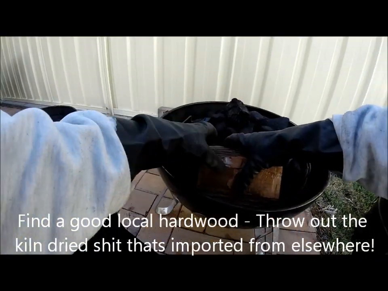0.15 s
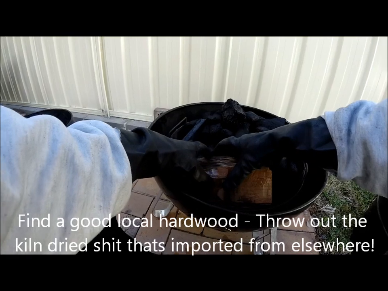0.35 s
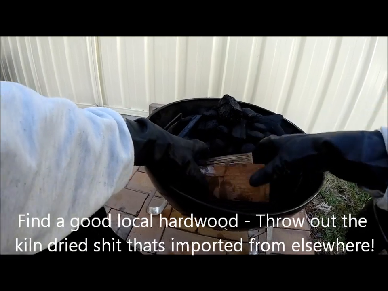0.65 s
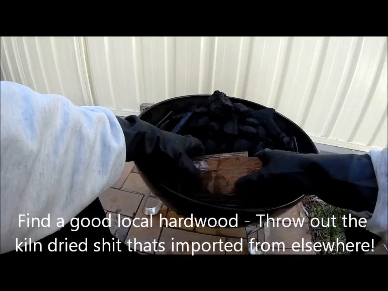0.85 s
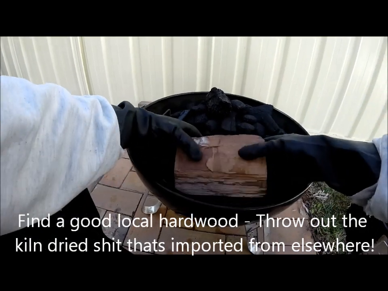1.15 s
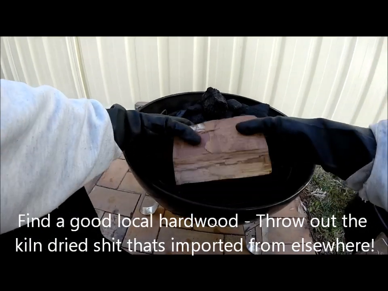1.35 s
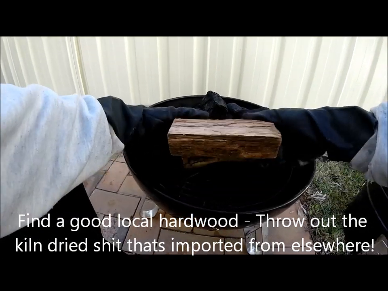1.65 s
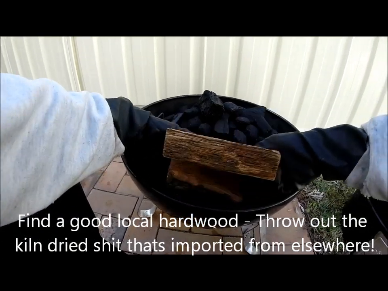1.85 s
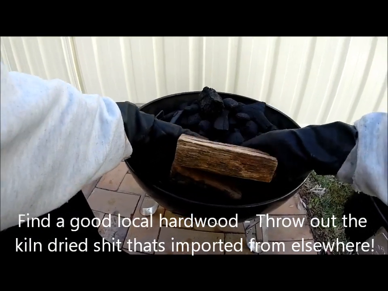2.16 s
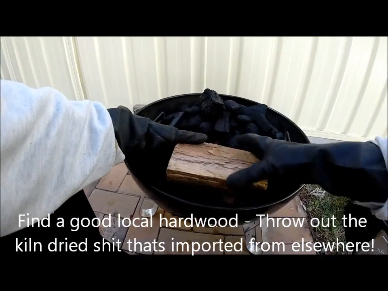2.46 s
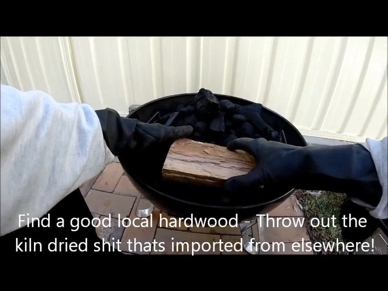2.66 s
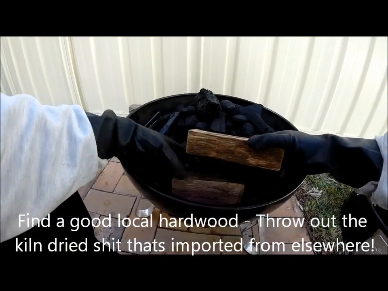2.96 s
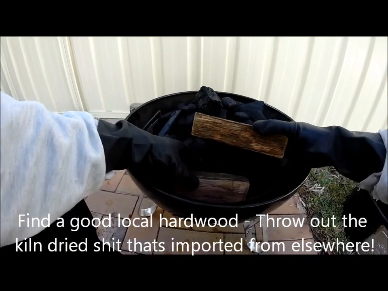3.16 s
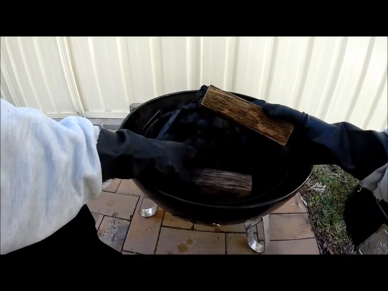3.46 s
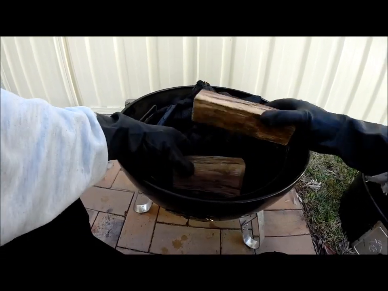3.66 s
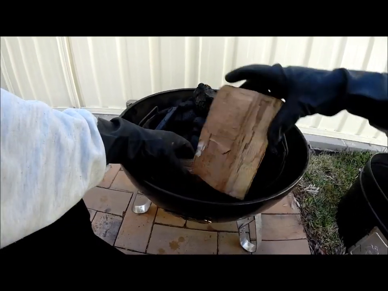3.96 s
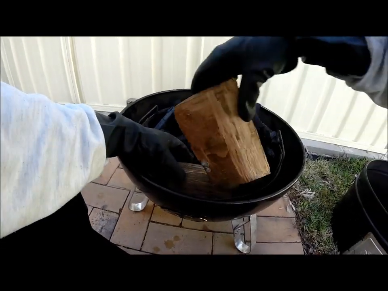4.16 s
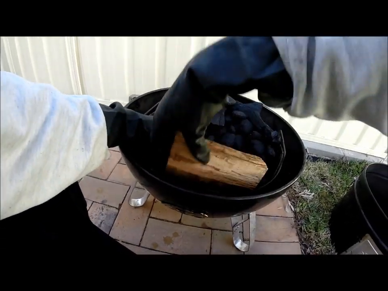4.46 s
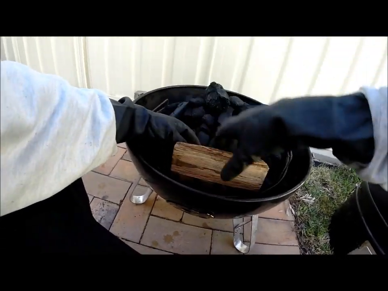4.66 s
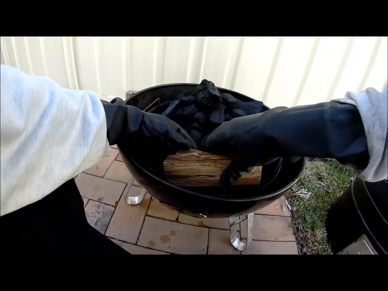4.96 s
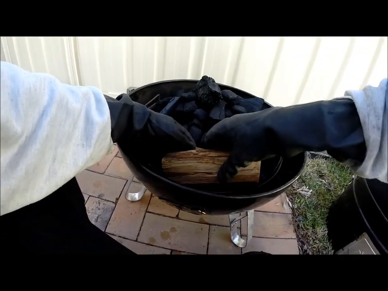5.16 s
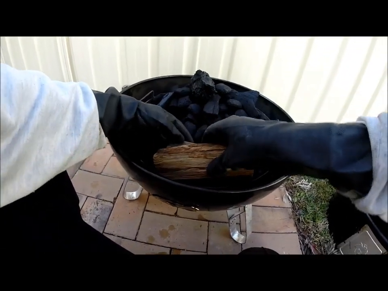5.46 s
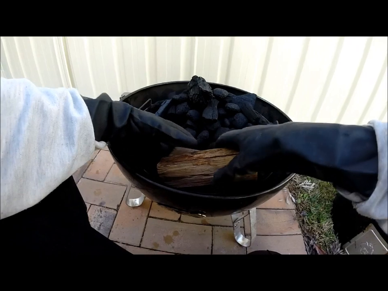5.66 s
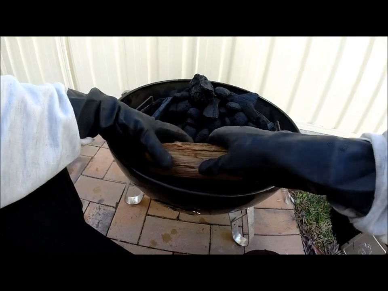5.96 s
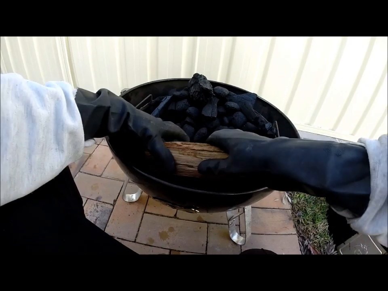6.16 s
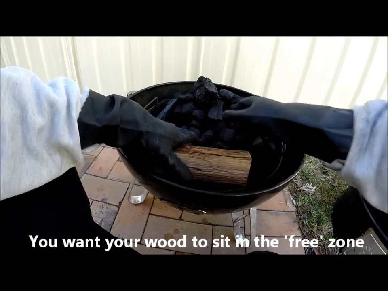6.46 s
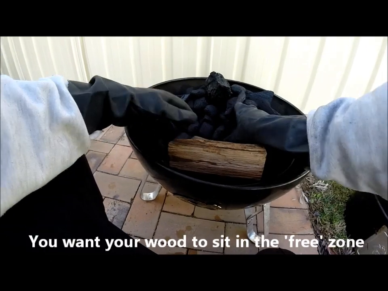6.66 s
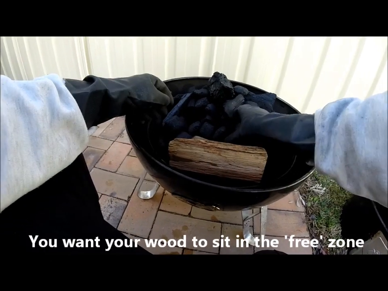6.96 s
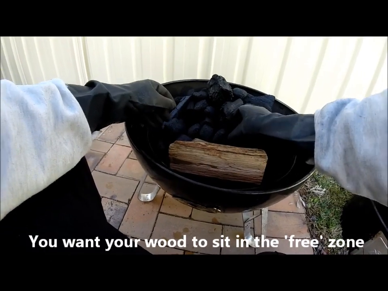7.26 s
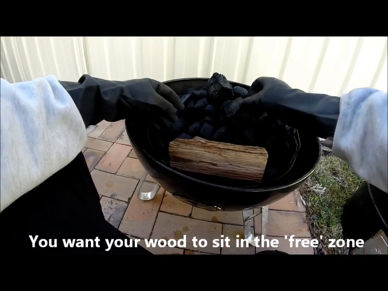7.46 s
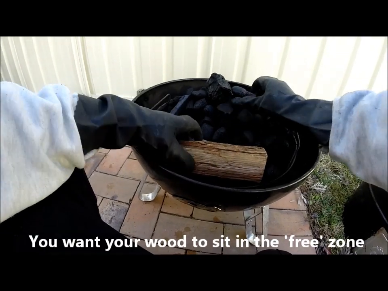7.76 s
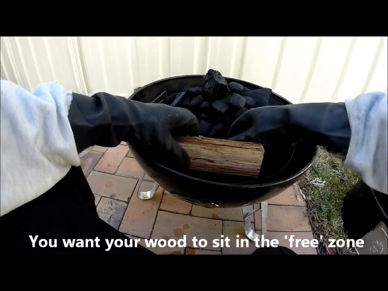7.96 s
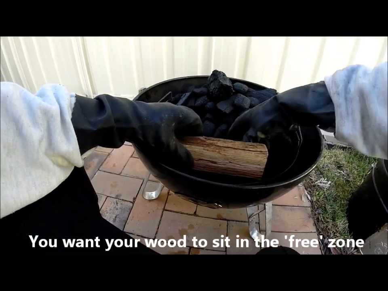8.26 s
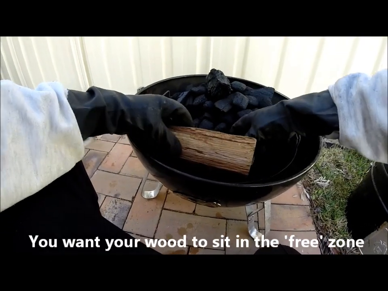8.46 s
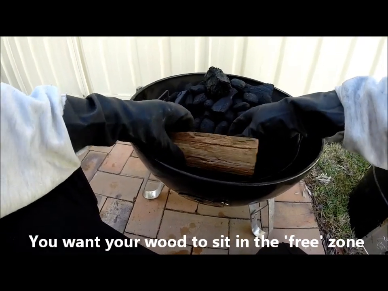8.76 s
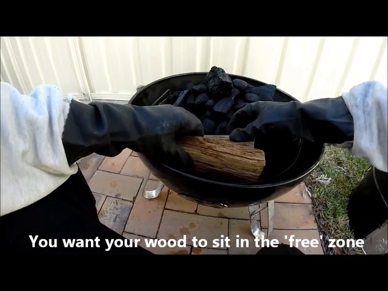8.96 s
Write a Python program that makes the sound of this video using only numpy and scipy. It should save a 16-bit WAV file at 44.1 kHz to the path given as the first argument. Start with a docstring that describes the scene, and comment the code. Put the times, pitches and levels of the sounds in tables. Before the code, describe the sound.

A wood chunk knocks and thuds in a metal grill bowl while charcoal briquettes clink and scrape, over a faint outdoor rumble.

```python
"""Wood and charcoal in a metal bowl

Gloved hands shift a wood chunk and briquettes outdoors. Dull thuds swell and die near 300 Hz,
the wood knocks, briquettes clink and grind by stick-slip, and a few blows ring the bowl.
The closed case around a worn camera colours the contact noise; the yard rumbles underneath."""
import sys
import numpy as np
from scipy import signal
from scipy.io import wavfile
from scipy.ndimage import uniform_filter1d

SR = 44100
rng = np.random.default_rng(int(sys.argv[2]) if len(sys.argv) > 2 else 0)


def unload_audio(sound):
    """Save the sound as a 16-bit wav file, at the path given as the first command line argument."""
    columns = np.transpose(np.atleast_2d(sound))
    # keep every value between -1 and 1, then stretch to whole-number steps
    steps = np.round(np.clip(columns, -1, 1) * 32767)
    wavfile.write(sys.argv[1], SR, steps.astype(np.int16))


N = 401751


# Blows of wood and hands on the bowl: peak t/s, level/dB, f/Hz, t60/s
THUDS = [(0.355, -7, 298, 0.022), (0.386, -23, 310, 0.051), (0.5825, -24.5, 282, 0.035),
         (0.6192, -17, 308, 0.036), (0.8554, -27, 323, 0.052), (1.2316, -18.5, 308, 0.032),
         (1.2906, -22, 321, 0.096), (1.4754, -14, 317, 0.039), (1.6152, -16.5, 248, 0.08),
         (1.6471, -22.5, 290, 0.069), (1.68, -28, 295, 0.059), (1.934, -14.5, 288, 0.071),
         (1.9648, -22.5, 307, 0.04), (2.025, -17, 297, 0.016), (2.039, -20.5, 247, 0.036),
         (2.2632, -18, 303, 0.066), (2.2966, -22.5, 310, 0.077), (2.359, -29, 290, 0.088),
         (2.533, -34, 305, 0.044), (2.7927, -24.5, 289, 0.071), (2.946, -20.5, 304.6, 0.11),
         (2.9921, -8, 303, 0.058), (3.041, -19.5, 316, 0.05), (3.3442, -23, 275, 0.068),
         (3.4267, -10.5, 305.5, 0.074), (3.6138, -21, 336, 0.031), (3.934, -19, 287, 0.031),
         (4.152, -29, 264, 0.032), (4.1826, -14, 294, 0.069), (4.3415, -18, 340, 0.035),
         (4.449, -25.5, 297, .09), (4.522, -16, 342, 0.026), (4.566, -11.5, 273, 0.035),
         (4.59, -19.5, 251, 0.047), (4.9017, -18.5, 284, 0.09), (4.93, -20, 342, 0.032),
         (4.9612, -19, 290, 0.044), (4.9761, -19, 322, 0.018), (5.051, -18.5, 274, 0.035),
         (5.1144, -20.5, 288, 0.048), (5.2374, -21, 255, 0.063), (5.8205, -26.5, 316, 0.076),
         (5.939, -18, 240, 0.017), (5.9895, -23.5, 265, 0.019), (6.011, -16.5, 274, 0.048),
         (6.296, -28.5, 251, 0.15), (7.11, -28, 279, 0.079), (7.2351, -36, 290, 0.091),
         (7.61, -30, 328, 0.079), (8.1282, -26.5, 303, 0.087), (8.2573, -24.5, 340, 0.024),
         (8.4471, -21.5, 290, 0.021), (8.6444, -15, 265, 0.058), (8.742, -23, 300, 0.052),
         (8.8001, -19.5, 246, 0.074), (8.813, -22, 297, 0.063), (8.9223, -23.5, 283, 0.1)]

def thuds(deep_hz=89.0, deep_db=-20.0):
    """A low resonance swells for a few cycles, roughened by contact; a deeper one shakes along."""
    out, t = np.zeros(N), np.arange(SR // 6) / SR
    body = through_case(91, 776)
    for peak_s, db, hz, t60_s in THUDS:
        rise_s = 0.00396 + 0.0478 * t60_s
        low = swell(t, rise_s, t60_s) * sine(t, hz)
        deep = gain_of(deep_db) * swell(t, 0.01, 0.14) * sine(t, deep_hz)
        contact = 0.45 * burst(t, rise_s, t60_s, body)
        add(out, peak_s - rise_s, gain_of(db) * (low + contact + deep))
    return out


# Dry knocks of the wood chunk: peak t/s, level/dB, f/Hz
WOOD_KNOCKS = [(0.3563, -23, 483), (0.374, -19, 965), (0.6214, -27, 600), (1.1569, -25, 604),
               (1.2847, -15, 590), (1.315, -17, 610), (1.4727, -12, 780), (1.6143, -14.5, 1092),
               (1.9366, -20.5, 595), (2.016, -27, 670), (2.0335, -30, 520), (2.2608, -26.5, 1020),
               (2.9885, -24, 560), (3.0035, -23, 566), (3.4267, -26, 530), (3.4435, -26, 1070),
               (3.616, -28, 747), (3.7474, -24.5, 590), (3.9367, -24.5, 964), (4.123, -34, 680),
               (4.1508, -27.5, 937), (4.3515, -30, 560), (4.5754, -19.5, 876), (4.895, -24, 654),
               (4.9483, -21.5, 1385), (5.271, -45, 880), (5.2853, -26.5, 1110), (6.0076, -24, 620),
               (6.6992, -26, 882), (6.905, -37, 957), (6.9563, -27.5, 876), (6.983, -33.5, 924),
               (7.0192, -29.5, 990), (7.054, -39, 1000), (7.083, -33, 935), (7.192, -38, 880),
               (7.28, -34, 900), (7.325, -27.5, 556), (7.396, -37.5, 880), (7.59, -28.5, 887),
               (7.6105, -28.5, 544), (7.7983, -30.5, 1010), (8.2734, -30.5, 850), (8.4471, -28, 676.0),
               (8.643, -25, 900), (8.6525, -22.5, 600)]

def knocks(lead_s=0.0025):
    """A short woody note inside a spray of contacts."""
    out, t = np.zeros(N), np.arange(SR // 8) / SR
    wood = through_case(322, 1940)
    for peak_s, db, hz in WOOD_KNOCKS:
        note = 0.72 * swell(t, 0.0014, 0.04) * sine(t, hz)
        contact = 0.79 * burst(t, 0.00066, 0.042, wood)
        add(out, peak_s - lead_s, gain_of(db) * (note + contact))
    return out


# Briquette strikes: peak t/s, level/dB, f/Hz, ring t60/s, relative sizzle/dB
CLINKS = [(0.0622, -28, 6950, 0.009, 7.5), (0.361, -32, 3210, 0.033, -18), (0.372, -22, 2360, 0.014, -11),
          (0.3827, -27.5, 2920, 0.028, -9.5), (0.74, -51, 3000, .03, -18), (0.817, -44.5, 2170, .02, -25),
          (0.885, -60, 3100, 0.026, -16.5), (1.104, -54, 5300, 0.028, -10),
          (1.1668, -42.5, 1970, 0.043, -3), (1.2824, -28.5, 2810, 0.049, -16),
          (1.3182, -27, 3180, 0.0085, -39), (1.477, -25.5, 3060, 0.025, -18),
          (1.6184, -25, 2890, 0.018, -18.5), (1.626, -26.5, 1670, 0.024, -34),
          (1.9293, -25.5, 2880, 0.012, -30), (1.9373, -33.5, 3100, 0.033, -15),
          (2.082, -38, 2720, 0.04, -14), (2.255, -51, 2850, 0.065, 1), (2.529, -50.5, 2900, 0.023, -4),
          (2.988, -15.5, 2930, 0.0075, -15), (3.0054, -29.5, 2480, 0.085, -14),
          (2.989, -19.5, 4460, 0.0057, -11.5), (3.176, -43.5, 1900, 0.017, -17),
          (3.23, -41.5, 3180, 0.018, -20), (3.368, -46, 3320, 0.052, -5), (3.444, -35, 3640, 0.018, -8),
          (3.8555, -35.5, 2850, 0.078, -32), (3.923, -36.5, 2780, 0.018, -3.5),
          (3.9384, -36.5, 2960, 0.035, -12), (4.1945, -27.5, 2990, 0.025, -12),
          (4.3385, -30, 2850, 0.043, -44), (4.5164, -28, 2130, 0.018, -10), (4.543, -31, 3160, 0.082, -4),
          (4.583, -30.5, 2870, 0.073, -6.5), (4.689, -46.5, 1970, 0.024, -3.5),
          (4.895, -38, 2850, 0.033, -4), (4.905, -25.5, 2580, 0.012, -30), (4.9365, -39, 6550, 0.013, 5),
          (4.9476, -24.5, 2020, 0.0067, -10), (4.949, -33, 5200, 0.01, -17),
          (4.973, -39.5, 2500, 0.0076, 0), (5.269, -47.5, 6500, 0.025, 6), (5.045, -46, 2970, 0.03, 0.5),
          (5.279, -38, 3000, 0.022, -7), (5.2835, -28.5, 3260, 0.011, -4), (5.3156, -38.5, 3140, 0.03, 2),
          (5.43, -50.5, 3120, 0.072, 1.5), (5.478, -41.5, 3320, 0.025, -9), (5.899, -41, 3070, 0.079, -2),
          (5.9418, -26.5, 2100, 0.015, -10.5), (6.023, -27, 2240, 0.023, -12),
          (6.3004, -34, 3320, 0.024, -0.5), (6.6957, -35, 2270, 0.015, -11), (6.937, -62, 7800, .06, -15),
          (6.958, -56, 2160, .012, -20), (7.017, -43, 2400, 0.034, -14), (7.056, -52, 2150, .04, -10),
          (7.084, -64, 8700, .04, -10), (7.123, -55, 5730, 0.072, -20), (7.124, -59, 7000, 0.1, -20),
          (7.132, -49, 2430, 0.021, -9), (7.27, -53, 3160, 0.046, -22), (7.587, -44, 2010.0, 0.0085, -26.0),
          (7.6071, -26, 2300, 0.005, -16.5), (7.8008, -45, 2410, 0.054, -9), (7.8345, -41, 2360, 0.09, -13),
          (8.4537, -40, 2000, 0.034, -25), (8.6626, -36.5, 2810.0, 0.028, -4.5),
          (8.737, -47.5, 3550, 0.027, 2.5), (8.863, -33.5, 5350, 0.028, -15),
          (8.7948, -36, 2960, 0.09, -6.5), (8.8572, -36, 2580, 0.053, -1.5),
          (8.878, -33.5, 3300, 0.049, -3), (8.913, -31.5, 2070, 0.015, -13), (8.935, -35, 2970, 0.036, -7)]

def clinks(rise_s=0.0016):
    """Each briquette rings on two close, beating modes inside a gritty crack."""
    out, t = np.zeros(N), np.arange(SR // 8) / SR
    stone, treble = through_case(1256, 3880), through_case(3820, 20000)
    for peak_s, db, hz, t60_s, sizzle_db in CLINKS:
        second_hz = hz * (1 + 0.05 * rng.uniform(-1.3, 1))
        modes = sine(t, hz) + 0.74 * np.sin(2 * np.pi * second_hz * t)
        ring = 1.08 * swell(t, rise_s, t60_s) * modes
        crack = 0.5 * burst(t, rise_s, 3.6 * t60_s, stone)
        sizzle = gain_of(sizzle_db) * burst(t, rise_s, 2 * t60_s, treble)
        add(out, peak_s - rise_s, gain_of(db) * (ring + crack + sizzle))
    return out


# Shoves of the heap: peak t/s, drag level/dB, grit level/dB, rise/s, fall/s
SHOVES = [(0.02, -40.5, -59, 0.11, 0.19), (0.38, -35, -48.5, 0.23, 0.2), (0.61, -43, -52, 0.27, 0.15),
          (0.88, -35, -52, 0.29, 0.1), (1.12, -33, -53, 0.06, 0.39), (1.3, -31.5, -45.5, 0.66, .3),
          (1.49, -28.5, -45.5, 0.31, 0.59), (1.63, -33, -40, 0.049, 0.036),
          (1.95, -41.5, -43.5, 0.049, 0.075), (2.018, -38, -52, 0.048, .6), (2.28, -33, -49, 0.085, 0.13),
          (2.475, -51, -51.5, .08, 0.092), (2.77, -38.5, -53, 0.16, 0.23),
          (2.94, -32.5, -41.5, 0.091, 0.23), (3.01, -17.5, -32, 0.054, 0.059),
          (3.442, -47, -38.5, 0.029, 0.04), (3.57, -38, -51.5, 0.1, 0.96), (3.937, -30, -48, 0.13, 0.16),
          (4.19, -32, -47.5, 0.098, 0.065), (4.36, -28, -49.5, 0.04, 0.095),
          (4.569, -20.5, -31, 0.12, 0.064), (4.72, -39.5, -53.5, 0.23, 1), (4.92, -30, -37.5, 0.053, 0.13),
          (5.29, -41.5, -54.5, 1, 0.32), (5.66, -42, -48.5, 0.62, 0.2), (6.02, -29, -40, 0.32, 0.2),
          (6.3, -34, -47, .12, 0.055), (6.46, -46, -53.5, 0.27, 0.11), (6.71, -41, -53, 0.27, 0.21),
          (6.83, -33, -52.5, 0.051, 0.11), (6.98, -39, -54.5, 0.27, 0.25),
          (7.11, -38.5, -55.5, 0.18, 0.055), (7.23, -35.5, -54.5, 0.12, 0.073),
          (7.62, -33.5, -50, 0.024, 0.18), (8.11, -41, -57, 0.89, 0.083), (8.258, -32.5, -52, 0.063, 0.028),
          (8.449, -37, -48, 0.17, 0.33), (8.56, -32.5, -48, 0.087, 0.3), (8.655, -27.5, -44, 0.051, 0.1),
          (8.88, -28, -43.5, 0.23, 0.13)]

def shove_envelope(levels_db, drop_db=20, rest_db=-66.5):
    """Shoves add in power over a floor; each is drop_db down one rise before or one fall after its peak."""
    t = np.arange(0, N + 256, 128) / SR
    peak_s, _, _, rise_s, fall_s = np.transpose(SHOVES)[:, :, None]
    away = np.maximum((peak_s - t) / rise_s, (t - peak_s) / fall_s)
    each = gain_of(levels_db[:, None] - drop_db * away)
    power = (each ** 2).sum(0) + gain_of(rest_db) ** 2
    return np.interp(np.arange(N) / SR, t, np.sqrt(power))


def rubbing(drag_share=0.43, stutter_db=2.5, stutter_s=0.042):
    """Slips shake the case low down, scrape the wood, and rasp through the grit in fits."""
    _, drag_db, grit_db, _, _ = np.transpose(SHOVES)
    drag = shove_envelope(drag_db, drop_db=25.8)
    scrape = shove_envelope(drag_share * drag_db + (1 - drag_share) * grit_db + 1)
    window = np.hanning(round(stutter_s * SR))
    fits = unit_rms(signal.oaconvolve(rng.standard_normal(N), window, "same"))
    grit = shove_envelope(grit_db) * unit_rms(gain_of(stutter_db * fits))
    slide = slips(150, 2.5, samples=900) + 0.4 * rng.standard_normal(N)
    grind = slide + 0.5 * lumps()
    layers = [(drag, 130, 450, slide),
              (scrape, 450, 1500, slide + 1.13 * slips(200, 3.4, samples=300)),
              (grit, 1500, 4400, grind + 0.33 * slips(90, 4, samples=500)),
              (grit * gain_of(-7), 4400, 9000, grind + 0.66 * slips(90, 3.2, samples=600)),
              (grit * gain_of(-20.5), 9000, 20000, grind + 1.7 * slips(60, 4.4, samples=500))]
    out = np.zeros(N)
    for envelope, lo_hz, hi_hz, drive in layers:
        band = signal.oaconvolve(drive, through_case(lo_hz, hi_hz))[:N]
        out += envelope * unit_rms(band)
    return out


def slips(rate_hz, spread_db, samples):
    """Random stick-slip contacts of uneven strength, each a swelling, fading scratch of noise."""
    strength = gain_of(spread_db * np.minimum(rng.exponential(1, N), 4))
    slipping = rng.random(N) < rate_hz / SR
    shape = np.hanning(samples) * np.geomspace(1, 0.05, samples)
    power = signal.oaconvolve((strength * slipping) ** 2, shape)[:N]
    return unit_rms(np.sqrt(abs(power)) * rng.standard_normal(N))


def lumps(sizes=9):
    """Each size of lump grinds now and then in its own narrow band."""
    out = np.zeros(N)
    for hz in np.geomspace(1900, 8000, sizes):
        band = signal.butter(1, [hz * 0.94, hz * 1.06], "bandpass", fs=SR)
        grind = signal.lfilter(*band, slips(30, 5.6, samples=1100))
        out += unit_rms(grind) * np.sqrt(hz)
    return unit_rms(out)


# Blows reaching the bowl wall: t/s, level/dB, upper-mode gain/dB
WALL_BLOWS = [(0.3695, -42.5, 0), (3.0006, -44, -4), (3.442, -37.5, -14), (6.022, -40.5, 6)]
# Wall modes: f/Hz, relative level/dB, t60/s
WALL_MODES = [(740, -14, 0.22), (950, -14, 0.21), (1070, -16, .5), (1156, 2, 0.58), (1450, -21, 0.4),
              (1720, -7.5, .17), (1880, -10.5, .28), (2280, -16, .15), (2740, -3, 0.14), (3120, -2, 0.16)]

def bowl(upper_hz=1600, rise_s=0.0046):
    """The steel wall rings on its modes; sharper blows wake the upper ones more."""
    out, t = np.zeros(N), np.arange(SR // 2) / SR
    for start_s, db, upper_db in WALL_BLOWS:
        for hz, mode_db, t60_s in WALL_MODES:
            gain = gain_of(db + mode_db + upper_db * (hz > upper_hz))
            add(out, start_s, gain * swell(t, rise_s, t60_s) * sine(t, hz))
    return out


def echoes(sound, t60_s=0.12):
    """Short scattered reflections from bowl, paving and fence."""
    taps = np.zeros(SR // 5)
    delays = np.arange(150, len(taps) - 20, 20)
    delays += rng.integers(0, 20, len(delays))
    taps[delays] = rng.choice([-1., 1.], len(delays)) * gain_of(-60 * delays / SR / t60_s)
    return signal.oaconvolve(sound, taps / np.linalg.norm(taps))[:N]


# Outdoor noise spectrum: f/Hz, relative density/dB
YARD_SPECTRUM = [(15, -43), (25, -8.5), (74, 10), (145, -7.5), (301, 0.5), (463, -14.5), (1020, -13.5),
                 (1400, -23), (2990, -32.5), (4610, -36), (6740, -41.5), (12900, -48), (16000, -66)]

def yard(rms_db=-46.5):
    """Steady rumble and hiss of the yard."""
    frames, hz = N // 512 + 5, np.fft.rfftfreq(2048, 1 / SR)
    real, imag = rng.standard_normal((frames, 1025, 2)).T
    spectra = (real + 1j * imag) * gain_of(curve_db(YARD_SPECTRUM, hz)[:, None])
    _, noise = signal.istft(spectra, nperseg=2048, noverlap=1536)
    return gain_of(rms_db) * unit_rms(noise[:N])


# Transmission of the closed case: f/Hz, relative level/dB
CASE_RESPONSE = [(76, -25), (130, -21.5), (319, -2), (382, -14), (475, -17), (569, -9.5), (695, -19.5),
                 (995, -14.5), (1370, -29), (1770, -32), (2500, -28), (3300, -28), (4000, -36),
                 (6490, -32.5), (7920, -41.5), (15300, -64)]

def through_case(lo_hz, hi_hz):
    """Minimum-phase impulse response of the case within one band, unit energy."""
    hz = np.fft.rfftfreq(8192, 1 / SR)
    low_cut_db = 10 * np.log10(1 + (lo_hz / (hz + 1)) ** 8)
    high_cut_db = 10 * np.log10(1 + (hz / hi_hz) ** 8)
    db = curve_db(CASE_RESPONSE, hz) - low_cut_db - high_cut_db
    log_gain = np.log(gain_of(np.maximum(db, -100)))
    mirrored = np.r_[log_gain, log_gain[-2:0:-1]]
    spectrum = np.exp(np.conj(signal.hilbert(mirrored)))
    taps = np.fft.ifft(spectrum).real[:3000]
    return taps / np.linalg.norm(taps)


def burst(t, rise_s, t60_s, body):
    """A spray of tiny contacts sounding through a body; peak about 1."""
    contacts = rng.standard_normal(len(t)) * swell(t, rise_s, t60_s)
    sound = signal.oaconvolve(contacts, body)[:len(t)]
    return sound / np.sqrt(2 * uniform_filter1d(sound ** 2, 130).max())


def swell(t, rise_s, t60_s):
    """Soft attack to 1, then exponential decay."""
    attack = np.sin(np.pi / 2 * np.minimum(t / rise_s, 1)) ** 2
    return attack * gain_of(-60 * np.maximum(t - rise_s, 0) / t60_s)


def sine(t, hz):
    """Tone of random phase."""
    return np.sin(2 * np.pi * (hz * t + rng.random()))


def gain_of(db):
    return 10 ** (np.asarray(db) / 20)


def unit_rms(x):
    return x / np.sqrt(np.mean(x ** 2) + 1e-20)


def curve_db(points, hz):
    points_hz, points_db = np.transpose(points)
    return np.interp(np.log(hz + 1), np.log(points_hz + 1), points_db)


def add(mix, start_s, sound):
    part = mix[round(start_s * SR):][:len(sound)]
    part += sound[:len(part)]


def scene(echo_db=-9.5):
    """Mono mix; only clinks and knocks echo."""
    bright = clinks() + knocks()
    return (thuds() + bright + gain_of(echo_db) * echoes(bright) + bowl() + rubbing() + yard())[None]


def record(dry):
    """The camera's band limit."""
    edge_hz = 15900
    lowpass = signal.firwin(511, edge_hz, window=("kaiser", 9), fs=SR)
    return signal.oaconvolve(dry, lowpass[None], "same")


dry = scene()
out = record(dry)
unload_audio(out)
```